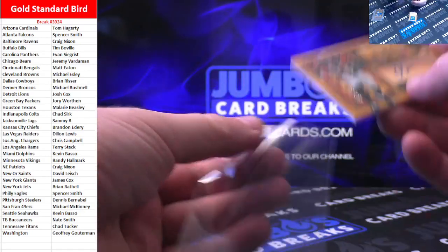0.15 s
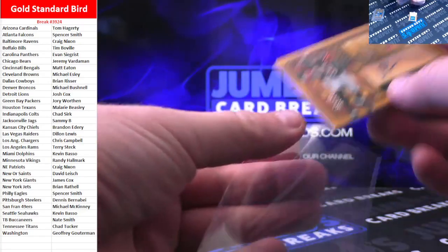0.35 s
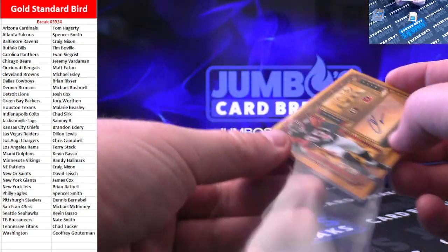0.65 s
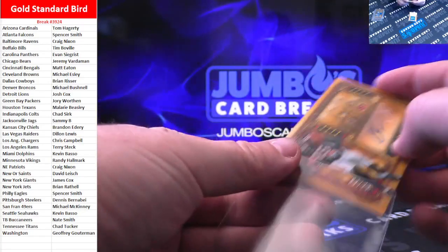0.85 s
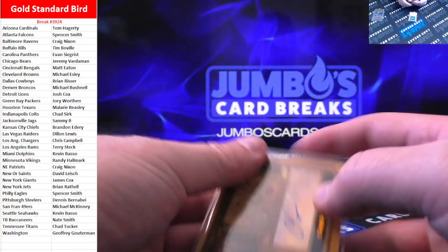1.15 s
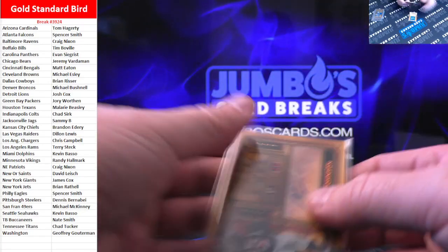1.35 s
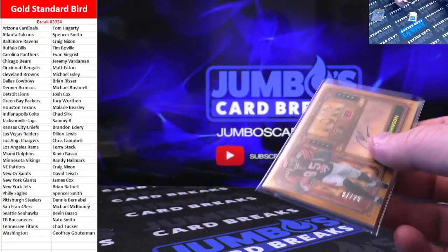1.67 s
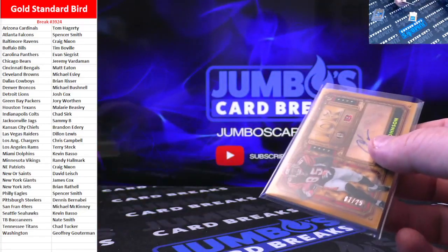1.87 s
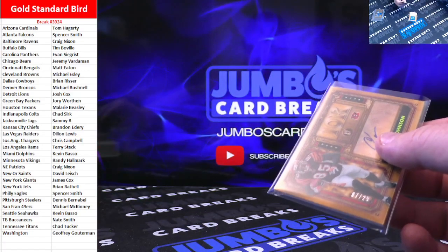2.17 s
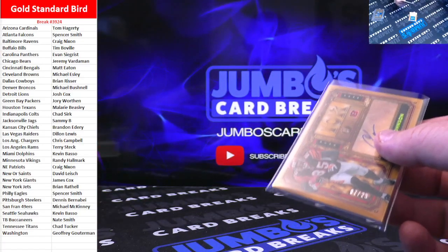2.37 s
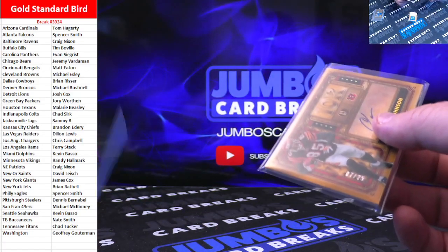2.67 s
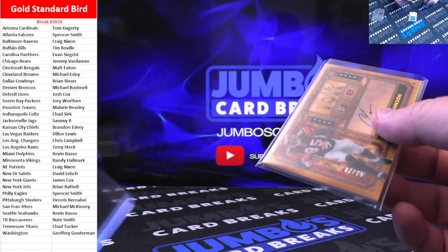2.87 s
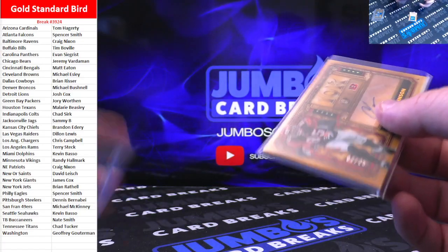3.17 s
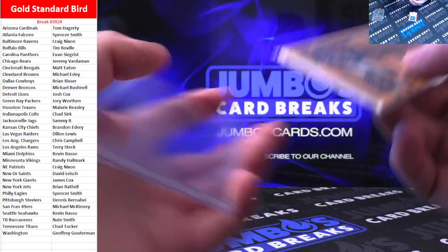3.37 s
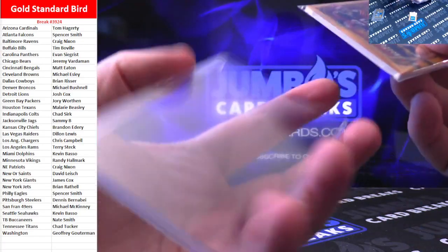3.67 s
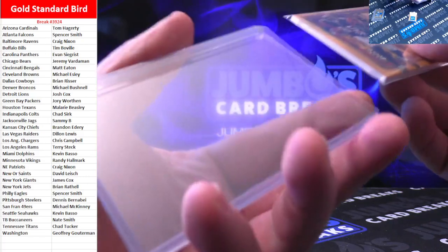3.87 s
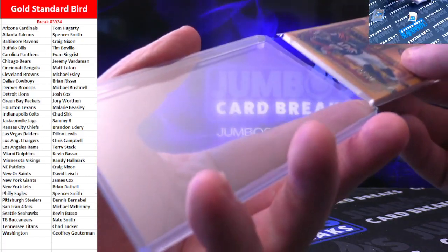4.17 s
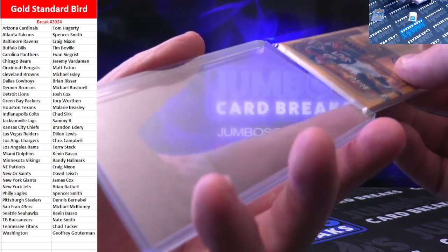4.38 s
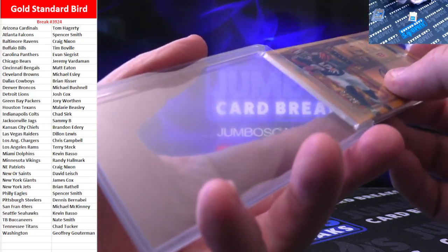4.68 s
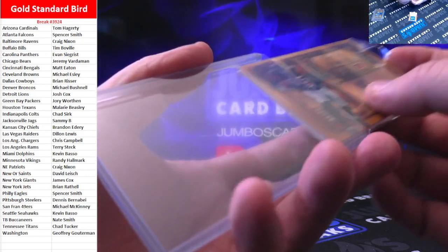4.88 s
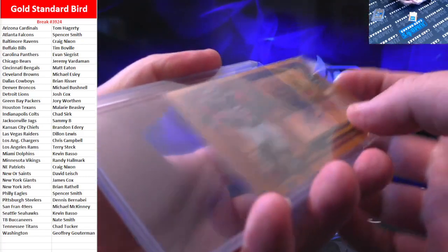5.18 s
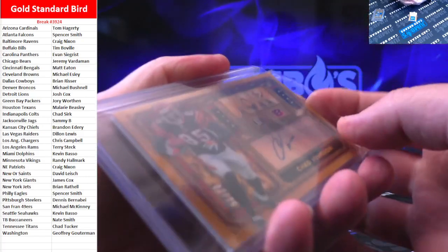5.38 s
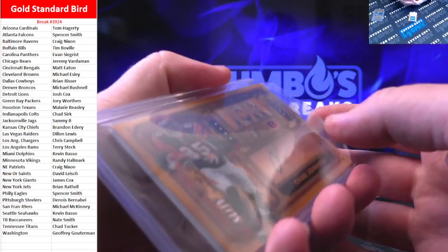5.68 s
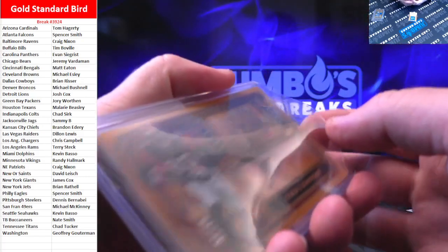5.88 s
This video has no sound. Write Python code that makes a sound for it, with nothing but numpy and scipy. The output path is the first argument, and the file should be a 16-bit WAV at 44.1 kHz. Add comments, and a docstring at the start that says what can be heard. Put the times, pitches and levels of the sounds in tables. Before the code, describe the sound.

Close, mono handling in a small furnished room with a low fan hum. A card goes into a soft film sleeve with hisses and crinkles, then a box is knocked and dragged on a desk, ending in a quick judder. A rigid holder taps lightly, and the sleeved card slides in with brighter hiss and small snaps.

```python
"""A small furnished room with a low air-handling hum, in mono. Hands slip a card into a soft film sleeve,
drag and knock a box of holders on a desk, then push the sleeved card into a rigid holder.
Hum, air, rubs and slides are shaped noise; blows and slips ring the box's modes; taps are dying sines;
snaps of film and plastic are an impulse in a volley of grains. A quieter room tail follows the hands."""
import sys
import numpy as np
from scipy import signal
from scipy.fft import rfft, irfft
from scipy.io import wavfile
from scipy.ndimage import uniform_filter1d

SR = 44100
rng = np.random.default_rng(int(sys.argv[2]) if len(sys.argv) > 2 else 0)


def pcm_store(signal):
    """Save signal as 16-bit PCM."""
    levels = np.round(np.clip(np.atleast_2d(signal), -1, 1) * 32767)
    wavfile.write(sys.argv[1], SR, levels.astype(np.int16).T)


N = 266187


def gain_of(db):
    """Amplitude gain of a level in dB."""
    return 10 ** (np.asarray(db) / 20)


def evened(x):
    """Scales a sound to rms 1."""
    return x / np.sqrt(np.mean(x ** 2) + 1e-20)


def peaked(x):
    """Scales a sound to peak 1."""
    return x / (abs(x).max() + 1e-20)


def read(points, hz):
    """Reads a table of (frequency, value) at hz, in straight lines over log frequency."""
    f, value = np.transpose(points)
    return np.interp(np.log(hz + 1), np.log(f + 1), value)


def add(mix, start_s, sound):
    """Lays a sound into the mix, cut off at the end of the mix."""
    part = mix[round(start_s * SR):][:len(sound)]
    part += sound[:len(part)]


def band(x, lo_hz, hi_hz):
    """Band-pass with gentle skirts."""
    edges_hz = [lo_hz, min(hi_hz, SR / 2 - 100)]
    return signal.sosfilt(signal.butter(N=2, Wn=edges_hz, btype="band", fs=SR, output="sos"), x)


def steep_band(x, lo_hz, hi_hz):
    """The same band-pass twice, for steeper skirts."""
    return band(band(x, lo_hz, hi_hz), lo_hz, hi_hz)


def coloured(x, spectrum):
    """Weights a sound's spectrum by a table of frequency and dB, then scales it to rms 1."""
    hz = np.fft.rfftfreq(len(x), 1 / SR)
    return evened(irfft(rfft(x) * gain_of(read(spectrum, hz)), len(x)))


def resonate(x, hz, width_hz):
    """A resonance of gain 1: shifts hz down to zero, smooths, and shifts back."""
    turn = np.exp(2j * np.pi * np.cumsum(hz * np.ones(len(x))) / SR)
    r = np.exp(-np.pi * width_hz / SR)
    return 2 * (turn * signal.lfilter([1 - r], [1, -r], x / turn)).real


def grainy(length, spread_db, grain_s):
    """Noise whose strength wanders at random from grain to grain, as tiny stick-slips do."""
    lumps = evened(uniform_filter1d(rng.standard_normal(length), max(round(grain_s * SR), 1)))
    return evened(rng.standard_normal(length) * gain_of(spread_db * lumps))


def stroke(rise_s, hold_s, fall_s):
    """Gain of one movement: it speeds up, holds, slows and stops."""
    rise, hold, fall = max(rise_s, .002), max(hold_s, .002), max(fall_s, .002)
    t = np.arange(0, rise + hold + fall, 1 / SR)
    corners_s = [0, rise, rise + hold, rise + hold + fall]
    db = np.interp(t, corners_s, [-21, 0, 0, -25.5])
    return signal.windows.tukey(len(t), .04) * gain_of(db)


def room_tone():
    """Fans and ducts: a lumpy low hum and a falling wash of air."""
    # spectrum of the hum: frequency_hz, density_db (per Hz)
    hum_spectrum = [(8.8, -63), (15, -49), (32, -7.5), (48, -7.5), (62, -10), (80, 6), (91, -4),
                    (102, -5.5), (131, -1.5), (146, -4.5), (162, -38), (170, -10.5), (220, -43),
                    (370, -120)]
    # spectrum of the air: frequency_hz, density_db (per Hz)
    air_spectrum = [(88, -48), (150, -6), (183, -1), (227, -5.5), (371, -10), (508, -17), (972, -25.5),
                    (1180, -30), (1930, -35), (2600, -38.5), (3160, -43), (15300, -48), (16500, -72)]
    hum = gain_of(-42.5) * coloured(rng.standard_normal(N), hum_spectrum)
    air = gain_of(-54) * coloured(rng.standard_normal(N), air_spectrum)
    return hum + air


def room(x):
    """A dense tail of reflections, each band dying at its own speed."""
    # how long the room rings: frequency_hz, t60_s (time to fall 60 dB)
    decay_times = [(300, 0.19), (1500, 0.22), (6000, 0.15), (14000, 0.057)]
    late = np.arange(SR // 2) > 130  # the first 3 ms stay empty
    taps = rng.standard_normal(SR // 2) * late
    hz, t, z = signal.stft(taps, SR, nperseg=128)
    decay = gain_of(-60 * t / read(decay_times, hz)[:, None])
    tail = signal.istft(z * decay, SR, nperseg=128)[1]
    return signal.fftconvolve(x, tail / np.linalg.norm(tail))[:N]


def rub():
    """Fingers shifting their grip on plastic: a dull, coarse-grained rustle."""
    # rise and fall of the rustle: time_s, level_db
    rub_levels = [(.3, -93), (.4, -67), (.65, -76.5), (.9, -70), (1.04, -88), (1.18, -72.5), (1.41, -74.5),
                  (1.6, -80), (2.9, -72), (3.02, -68.5), (3.3, -78), (3.6, -66.5), (3.8, -81), (4.28, -96),
                  (4.35, -65.5), (4.42, -80), (4.7, -72.5), (5.0, -70.5), (5.15, -65), (5.3, -83),
                  (5.44, -73.5), (5.66, -80), (5.75, -62), (5.85, -81), (6.04, -68)]
    time_s, level_db = np.transpose(rub_levels)
    level = gain_of(np.interp(np.arange(N) / SR, time_s, level_db))
    return level * evened(band(grainy(N, 2.6, 0.012), 940, 3000))


def slide(rise_s, hold_s, fall_s, hiss_db, hz, fizz_db):
    """Smooth films rub: a fine fluttering hiss with a broad resonance and a fizz above."""
    move = stroke(rise_s, hold_s, fall_s)
    flutter = gain_of(1.5 * evened(band(rng.standard_normal(len(move)), 12, 45)))
    grains = flutter * grainy(len(move), 1.5, .002)
    focus = evened(resonate(resonate(grains, hz, 1900), hz, 1900))
    hiss = evened(focus + .85 * evened(steep_band(grains, 4300, 9700)))
    fizz = evened(band(band(grains, 10800, 17000), 9100, 17000))
    return move * gain_of(hiss_db) * (hiss + gain_of(fizz_db) * fizz)


def box(drive, centre_hz, octaves, least_db):
    """The box's modes; those near the drive's centre ring most, far ones are cut by least_db at most."""
    # resonances of the box: frequency_hz, width_hz, level_db (before division by the root of the width)
    modes = [(361, 71, 10.5), (380, 13.5, 9.5), (430, 23, 4), (555, 30, 1.5), (616, 50, 4),
             (694.6, 34, 3.5), (842, 67, -6), (956, 67, 2.5), (1040, 53, 0.3), (1264, 59, 1.8),
             (1495, 114, -1.5), (1697, 170, 0.5), (1930, 140, -5), (2110, 120, -2.5), (2460, 110, -12),
             (2763, 21, -12), (3420, 61, -28)]
    total = 0
    for k, (hz, width_hz, db) in enumerate(modes):
        distance = np.log2(hz / centre_hz) / octaves
        reach_db = np.maximum(-6 * distance ** 2, least_db)
        ring = resonate(drive, hz, width_hz) / np.sqrt(width_hz)
        total = total + (-1) ** k * gain_of(db + reach_db) * ring  # neighbours in opposite sign
    return total


def drag(rise_s, hold_s, fall_s, db, hz, octaves, grit_db):
    """The rough desk shakes the box in dense slips; grit hisses under its edge."""
    # spectrum of the grit: frequency_hz, density_db (per Hz)
    grit_spectrum = [(1470, 2), (2500, -2), (3570, -7.5), (4410, -12.5), (6920, -11.5), (7360, -16),
                     (8660, -14), (11100, -25), (16000, -28)]
    move = stroke(rise_s, hold_s, fall_s)
    slips = grainy(len(move), 1.5, .003)
    ring = evened(box(slips, hz, max(octaves, .2), -14.0))
    grit = gain_of(grit_db) * coloured(slips, grit_spectrum)
    return move * gain_of(db) * (ring + grit)


def knock(db, hz, edge_db, octaves=0.58):
    """One blow and a brief rattle set the box ringing; a hard edge wakes its upper modes."""
    t = np.arange(6000) / SR
    rattle = rng.standard_normal(len(t)) * gain_of(-60 * t / 0.047)
    blow = .07 * rattle + band(signal.unit_impulse(len(t)), 150, 3500) * 6
    edge = peaked(box(blow, 1900, .55, -30)) + .2 * peaked(band(rattle, 3000, 9000))
    body = peaked(box(blow, hz, octaves, -26))
    return gain_of(db) * peaked(body + gain_of(edge_db) * edge)


def judder():
    """Eleven slips of the box, as knocks, each gap longer than the one before; counted back from the last."""
    last_slip_s, last_gap_s, slowing = 2.889, .047, 1.235  # slowing: ratio of each gap to the one before
    db, hz, edge_db, octaves = -39, 1700, -20, .2
    gaps_s = last_gap_s / slowing ** np.arange(11)
    starts_s = last_slip_s - np.cumsum(gaps_s) + gaps_s
    return [(start_s, db, hz, edge_db, octaves) for start_s in starts_s]


def tap(db, centre_hz):
    """The holder's modes ring briefly; those near the centre of the blow ring most."""
    # resonances of the empty holder: frequency_hz, level_db, t60_s
    modes = [(620, -6, .012), (1150, -2, .012), (1650, -9, .01), (2220, -2, .014), (2725, 0, .018),
             (4150, -4, .012), (4950, -10, .012)]
    t = np.arange(3000) / SR
    rings = 0
    for hz, mode_db, t60_s in modes:
        reach_db = -4.7 * np.log2(hz / centre_hz) ** 2
        rings = rings + gain_of(mode_db + reach_db - 60 * t / t60_s) * np.sin(2 * np.pi * hz * t)
    contact = band(rng.standard_normal(len(t)), 1200, 6100) * gain_of(-60 * t / 0.022)
    return gain_of(db) * peaked(peaked(rings) + 0.2 * contact)


def snap(db, hz, thud_db, crackle_db, fizz_db):
    """A buckle lets go with one main crack inside a short volley of small ones, and the plastic rings."""
    t = np.arange(3000) / SR
    volley = grainy(len(t), 2.4, 0.0006) * gain_of(-60 * t / 0.026) * (1 - np.exp(-t / 0.0027))
    crack = signal.unit_impulse(len(t), idx=30)
    struck = 0.21 * volley + crack
    sharp = volley + 2.58 * crack
    ring = resonate(resonate(struck, hz, .32 * hz), hz, .32 * hz)
    body = peaked(peaked(ring) + 0.61 * peaked(band(band(struck, 1090, 3700), 1200, 3300)))
    thud = gain_of(thud_db) * peaked(steep_band(struck, 570, 1500))
    crackle_hz = 5370 + 111 * crackle_db  # snaps with more crackle crackle higher
    crackle = gain_of(crackle_db) * peaked(resonate(band(sharp, 4900, 8800), crackle_hz, 4600))
    fizz = gain_of(fizz_db) * peaked(band(band(sharp, 8700, 14500), 7900, 22200))
    return gain_of(db) * (body + thud + crackle + fizz)


def scene():
    """The hands' sounds laid out in time, with the room's tail and tone around them."""
    # strokes of film on card and plastic: start_s, rise_s, hold_s, fall_s,
    # hiss_db, resonance_hz, fizz_db (re hiss)
    slides = [(.375, .005, .03, 0.29, -62, 6300, -5.5), (.68, 0.037, 0.12, .1, -70.5, 4940, -14),
              (.67, 0.19, 0.12, .015, -62.5, 8050, 2), (.94, .005, .015, 0.17, -64, 6950, 4),
              (1.028, 0.0024, 0.011, 0.22, -66.5, 5860, -6), (1.28, 0.13, 0.26, .25, -76, 8600, -7),
              (1.9, 0.032, .04, .02, -66, 7500, -6), (3.0, .15, 0.068, 0.35, -79, 7150, 1),
              (3.5, 0.076, .02, 0.27, -74, 6150, -9), (4.3, 0.037, .01, .06, -75, 7400, 0),
              (4.45, 0.09, .02, 0.25, -77, 7800, -2), (4.62, 0.075, .04, 0.13, -64.5, 7250, -3),
              (4.76, 0.032, .01, 0.18, -58.5, 7260, -4), (4.84, 0.057, 0.06, 0.35, -60.5, 7300, -10),
              (5.0, .045, 0.12, 0.017, -59, 7750, -4), (5.16, .005, .01, 0.091, -65, 6980, 0),
              (5.33, 0.073, .02, 0.15, -70, 8600, -5), (5.695, 0.03, 0.05, .06, -66.5, 6840, -9),
              (5.88, .04, .1, .05, -81, 6430, -4)]
    # the box dragged over the desk: start_s, rise_s, hold_s, fall_s, ring_db, centre_hz of the scrape,
    # spread_octaves (drag() takes at least 0.2), grit_db (re ring)
    drags = [(1.82, 0.028, 0.15, 0.21, -48, 536, 0.17, -10),
             (2.055, 0.011, 0.1, 0.18, -50, 740, 0.85, -5.5), (2.2, .1, 0.044, 0.09, -42.5, 780, 1.6, -8.5),
             (2.607, 0.016, 0.053, 0.32, -44.5, 1330, 1, -6.5),
             (2.75, 0.071, 0.15, 0.081, -53, 1500, 0.89, -2)]
    # knocks on the box: start_s, peak_db, centre_hz of the blow, edge_db (hard edge re body)
    knocks = [(1.826, -44, 537, -34), (1.863, -41.5, 560, -3), (1.884, -37, 590, -1),
              (1.923, -45, 560, -30), (2.083, -35, 666, -37), (2.112, -16.5, 782, -9),
              (2.128, -30.5, 676, 2), (2.231, -37.5, 785, 5), (2.236, -30, 726, -3.5), (2.273, -27, 980, 3),
              (2.311, -25, 990, 27), (2.349, -37.5, 420, -18), (2.623, -37.5, 1070, -23)]
    # the empty holder tapped as it is picked up: start_s, peak_db, centre_hz of the blow
    taps = [(3.518, -54, 2500), (3.5555, -29.5, 2280), (3.5902, -30, 1980), (3.617, -35.5, 2800),
            (3.667, -49, 2800), (3.84, -57, 2800)]
    # crinkles and taps of film and holder: start_s, body_peak_db, ring_hz,
    # thud_db, crackle_db, fizz_db (all three re body)
    snaps = [(0.3466, -44.5, 1620, -1, 2, -9), (0.3572, -32.5, 3550, -12, 0, -0.5),
             (0.3644, -39, 2120, -4, 13.5, 9), (0.4174, -39.5, 2220, -12, 1, -19),
             (0.5778, -44.5, 2410, -13, 6, -6), (0.9318, -39, 2630, -3.5, 2, 6.5),
             (0.94, -42.5, 1820, -4, 14.5, 11), (1.019, -57.5, 2410, -9, 0, 9),
             (1.0235, -38.5, 2400, -7, 13, 3), (1.19, -69, 2500, -16, 10, 2),
             (1.2225, -54, 2570, -6, 5.5, 4), (1.241, -55, 2500, -8, 5, 3), (2.063, -46, 1440, -10, 3.5, 0),
             (2.178, -56, 3000, -10, -10, 7), (2.2992, -29, 1380, 3.5, -13, -25),
             (2.317, -38.5, 2600, -12, 2.5, -9), (2.4403, -47, 2140, -19, -4, -16),
             (2.9542, -31.5, 1650, -6, -6.5, -16), (3.102, -51.5, 2140, -10, -3, -27),
             (4.5086, -54, 2060, -7, -2, 1), (4.6394, -75, 1980, -5, 19, 0),
             (4.703, -43.5, 2280, -3.5, -3, -20), (5.1597, -38.5, 2420, -6.5, 4.7, 4),
             (5.246, -50, 1850, -16, -8, -27), (5.3484, -69, 1460, -3, 4, 12),
             (5.3839, -43, 2480, -23, -10, -11), (5.3949, -30, 2480, -23, -9, -7.5),
             (5.4412, -56, 2480, -13, 0, -7), (5.5408, -32.5, 1670, -6.5, -22, -14),
             (5.5642, -55.5, 1440, -8, 5, 10), (5.5813, -41.5, 1820, -3, 2, 4.5),
             (5.8142, -42.5, 1530, -10, -6.5, -3), (5.9, -51.5, 2000, -9, -23, -20),
             (5.9539, -44, 2630, -0.5, -5.5, -13), (5.9738, -44.5, 1710, -8, -1.5, -8)]
    hands = rub()
    layers = ((slides, slide), (drags, drag), (list(knocks) + judder(), knock), (taps, tap), (snaps, snap))
    for events, source in layers:
        for start_s, *settings in events:
            add(hands, start_s, source(*settings))
    return (hands + gain_of(-10) * room(hands) + room_tone())[None]


def record(dry):
    """A fade over the last 200 samples, then a low-pass at 16 kHz."""
    faded = dry * np.clip((N - np.arange(N)) / 200, 0, 1)
    low_pass = signal.firwin(161, 16000, window=("kaiser", 8), fs=SR)
    return signal.oaconvolve(faded, low_pass[None], "same")


dry = scene()
out = record(dry)
pcm_store(out)
```